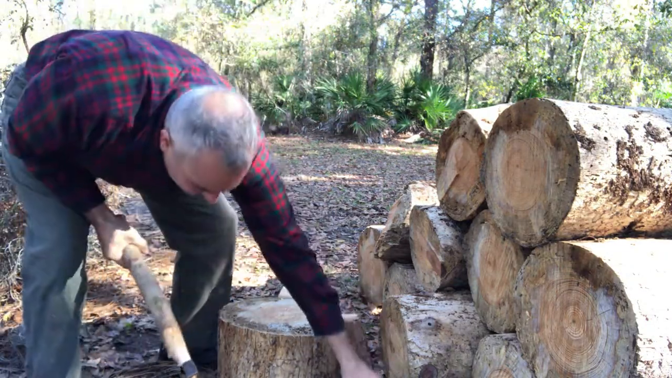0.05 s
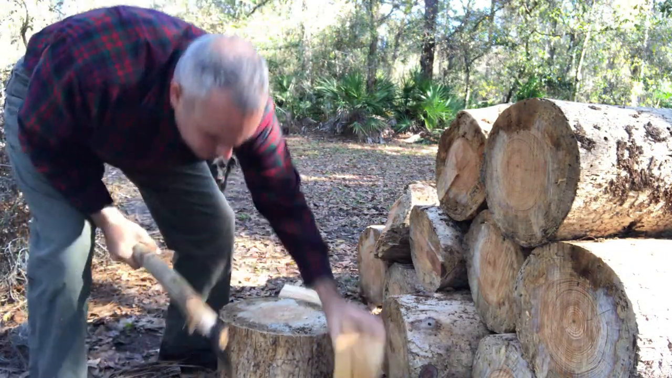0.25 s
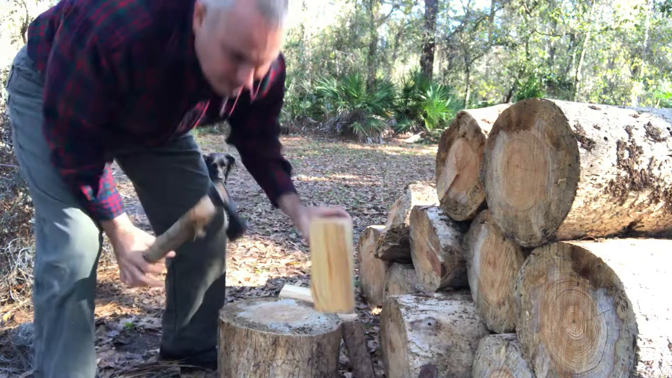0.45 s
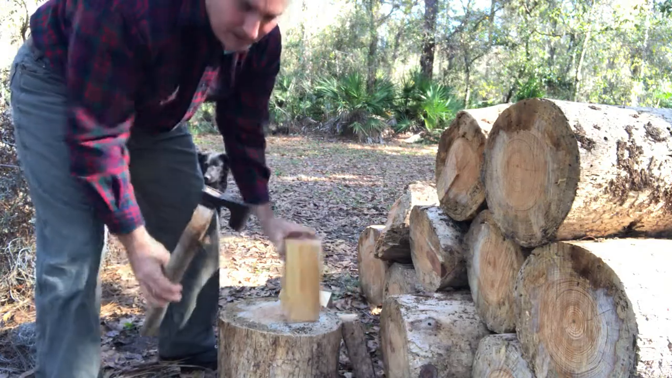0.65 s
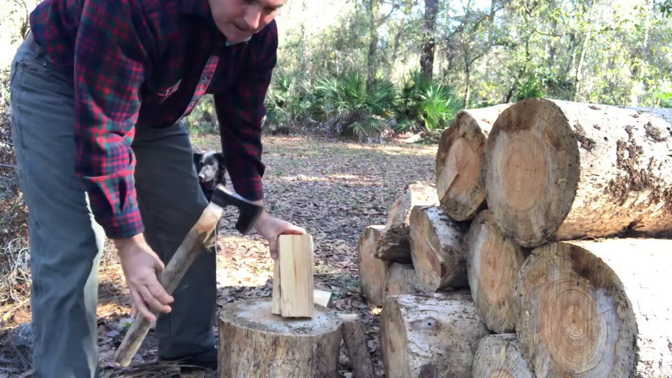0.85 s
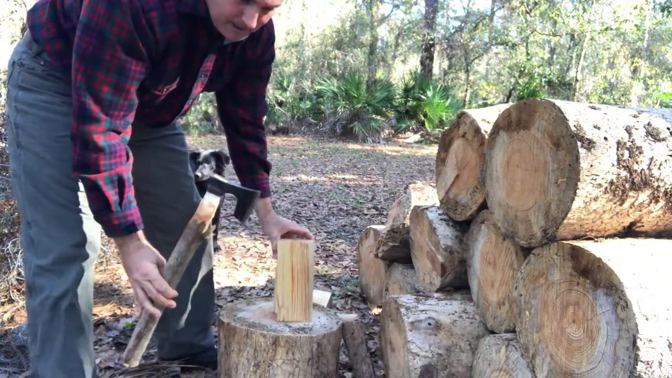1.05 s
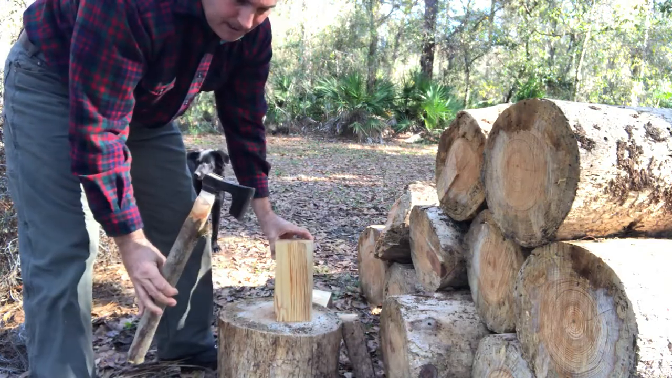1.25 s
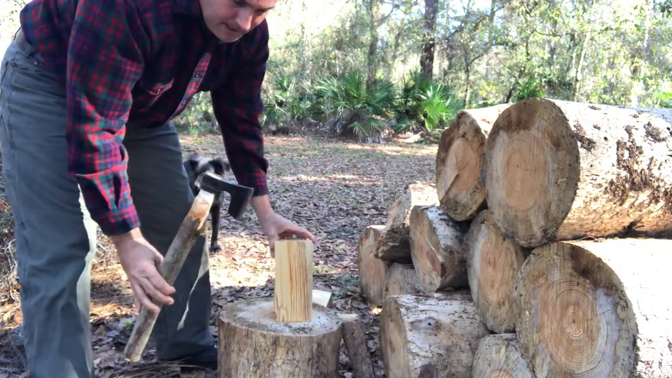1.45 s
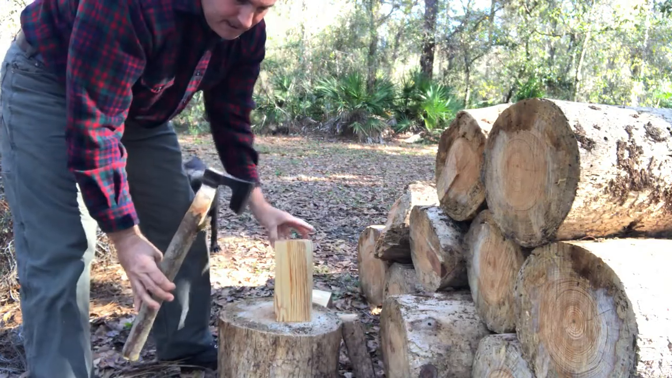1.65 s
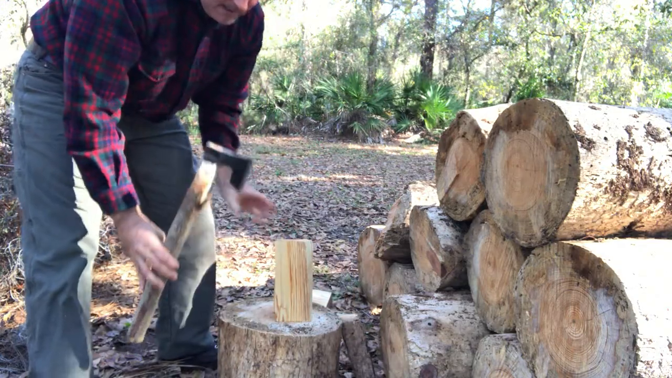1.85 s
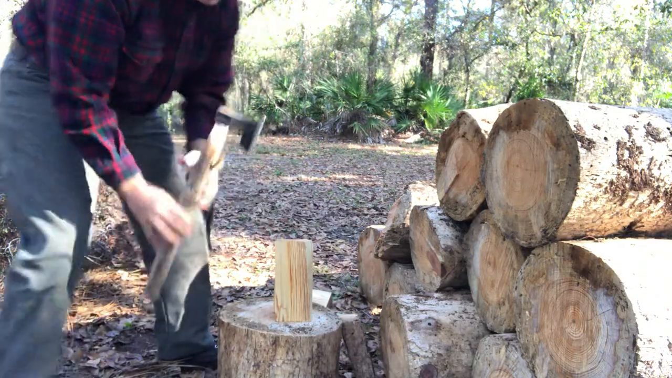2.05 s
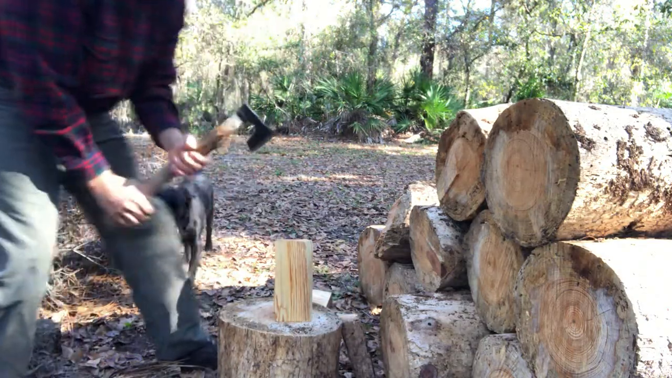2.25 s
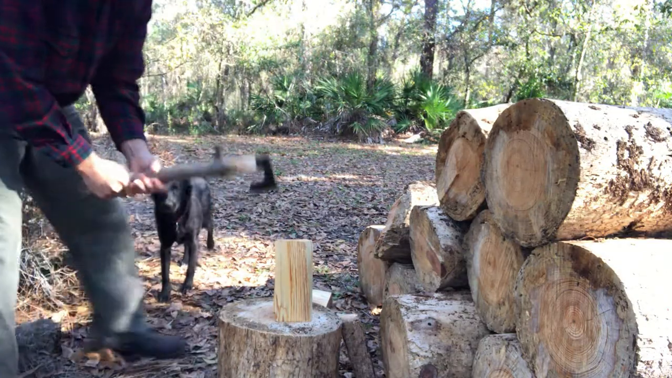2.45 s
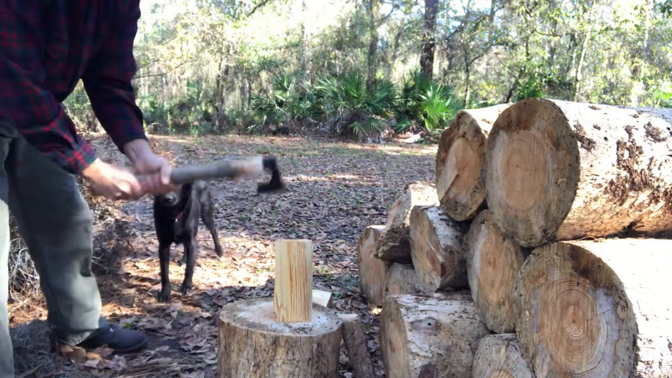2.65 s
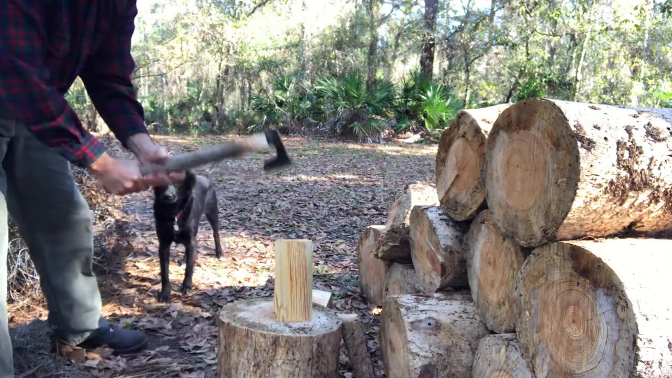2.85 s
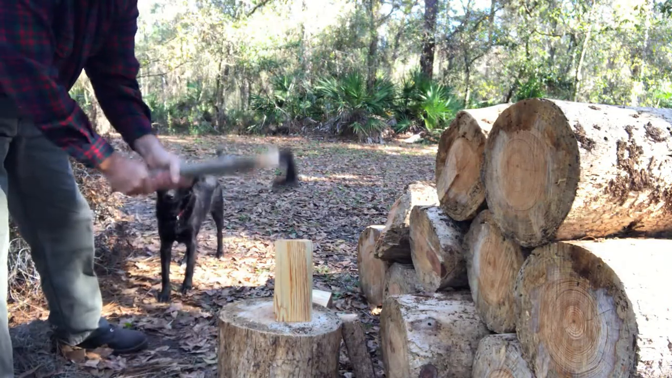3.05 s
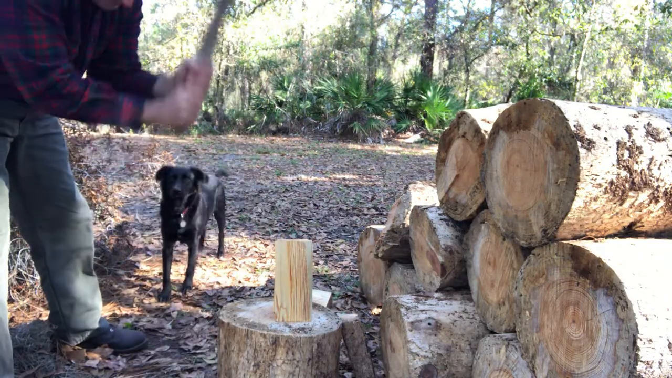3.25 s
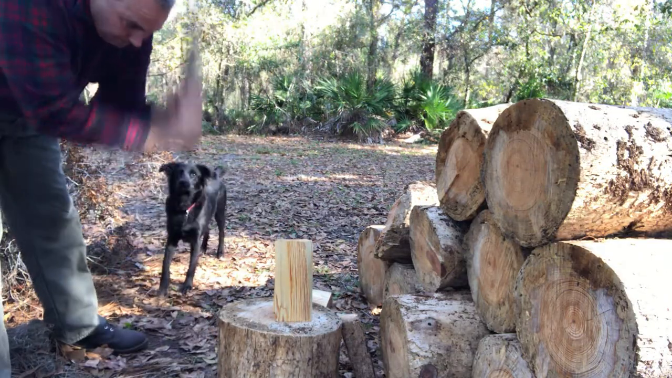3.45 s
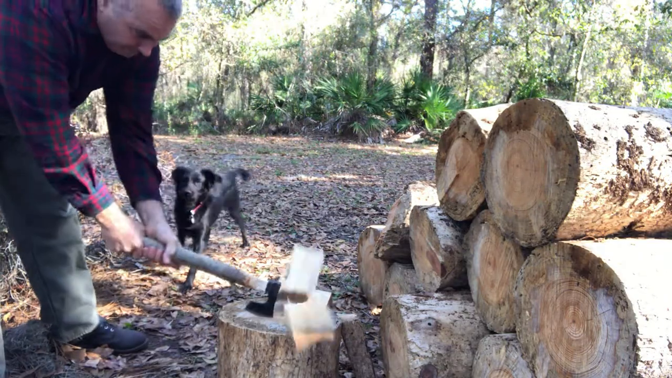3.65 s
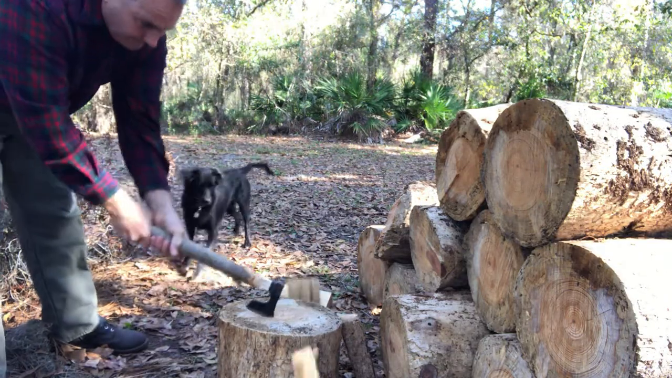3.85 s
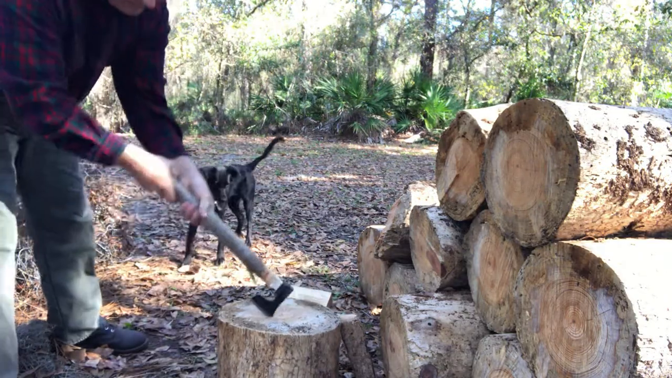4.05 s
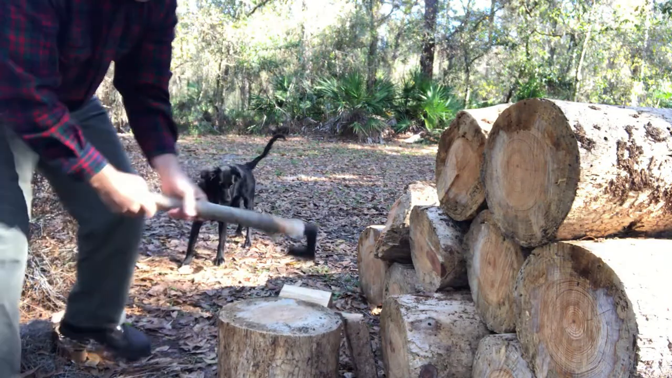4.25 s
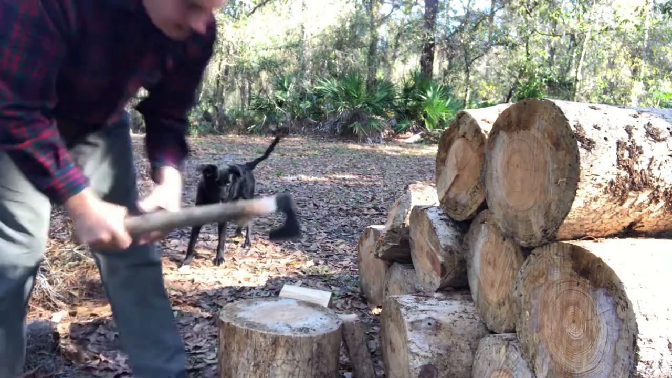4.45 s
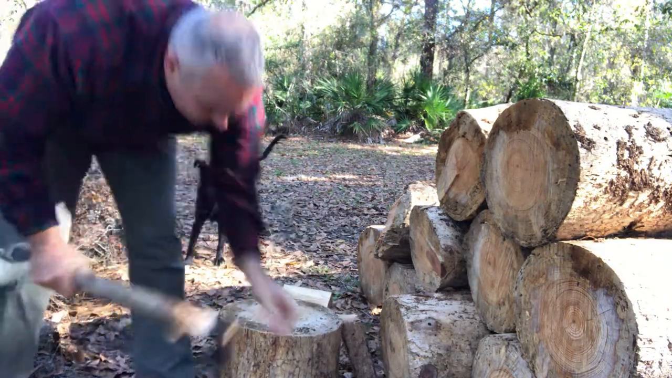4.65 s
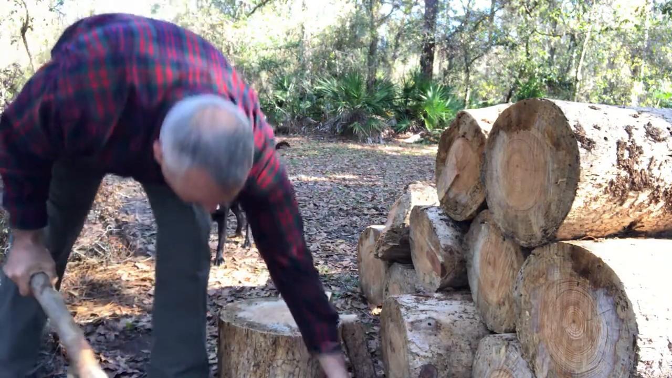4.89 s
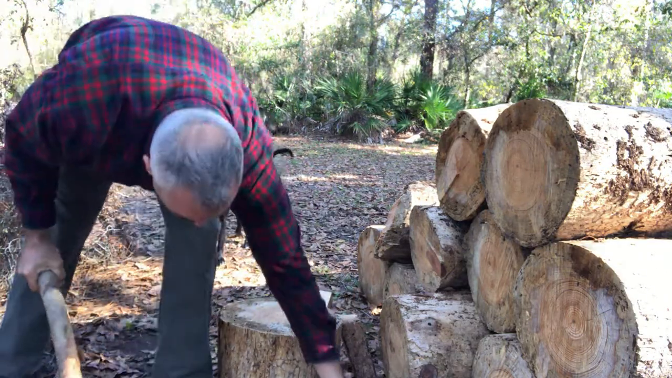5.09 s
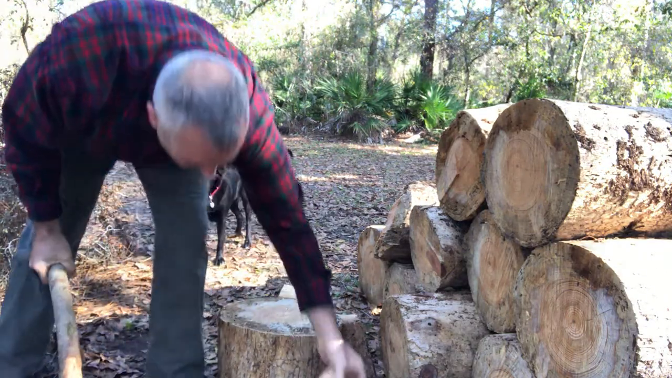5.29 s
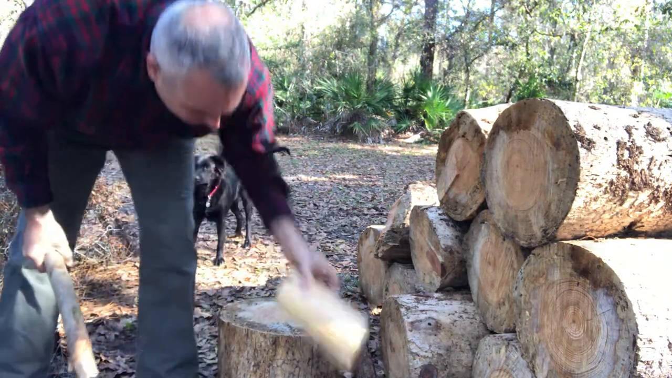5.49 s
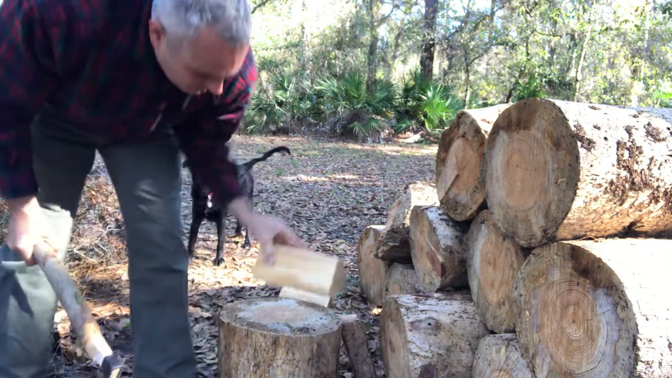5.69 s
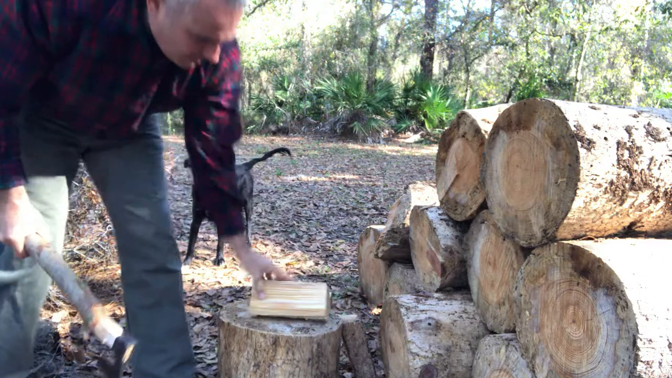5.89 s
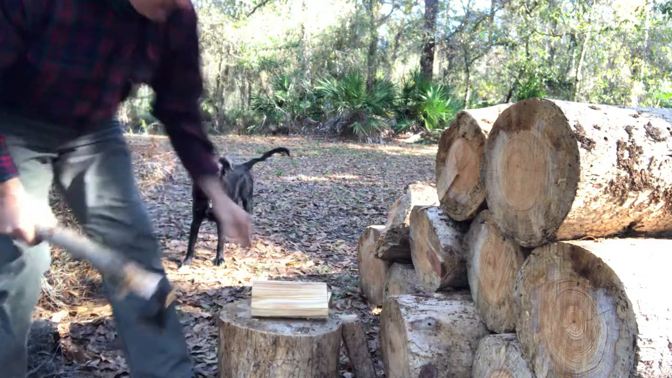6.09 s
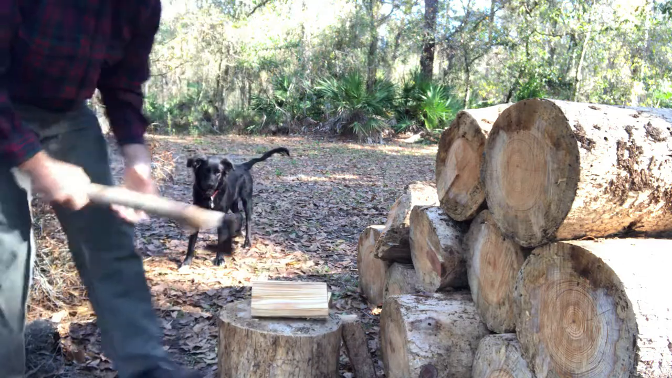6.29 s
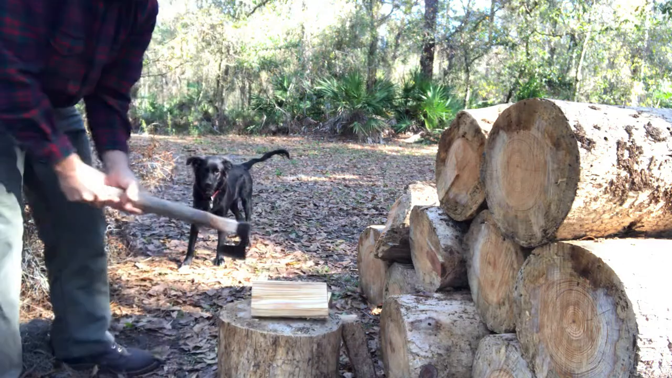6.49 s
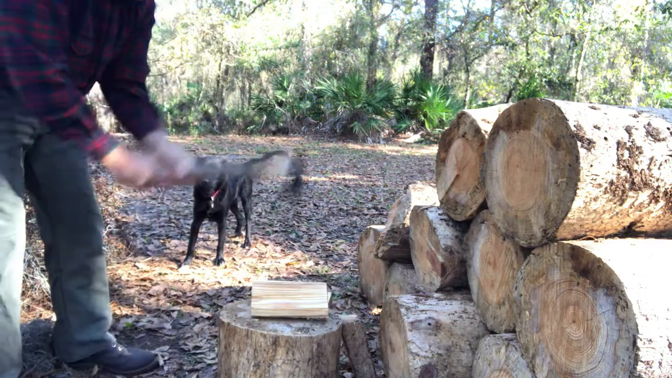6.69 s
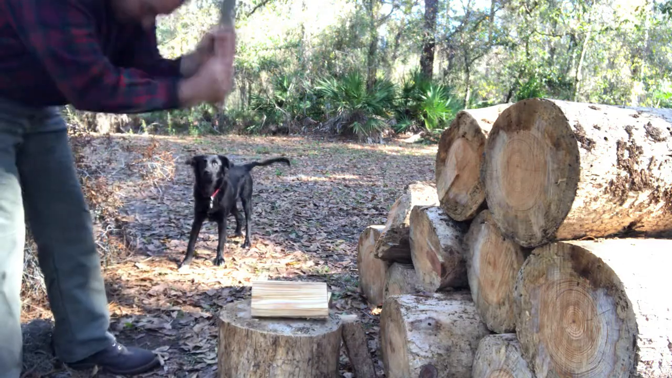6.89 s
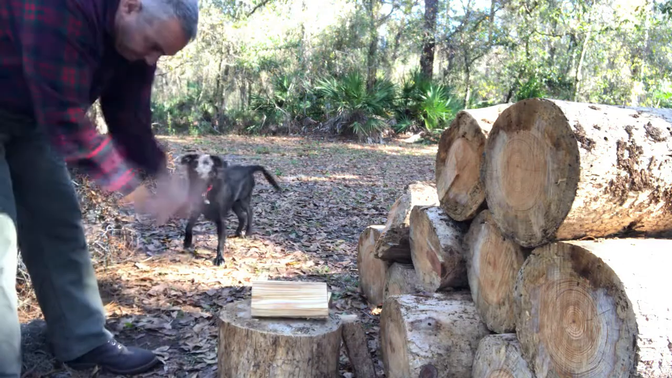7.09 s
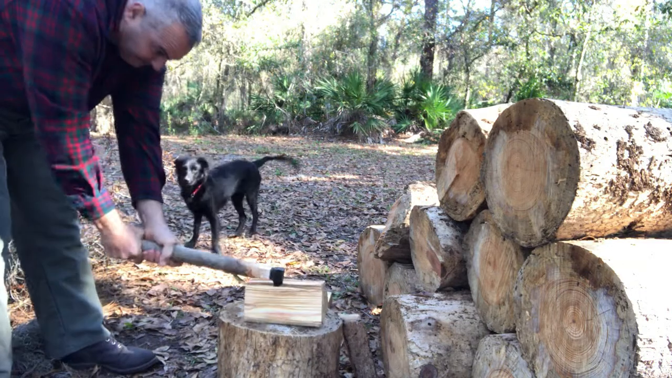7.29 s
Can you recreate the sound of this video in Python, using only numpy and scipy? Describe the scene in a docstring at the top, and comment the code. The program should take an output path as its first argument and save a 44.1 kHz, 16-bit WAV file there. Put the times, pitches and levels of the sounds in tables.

```python
"""Splitting firewood in the woods

A log is set on a stump and a hatchet tears through it: the wood rings, its fibres crack, and the
halves thud into dry leaves. Boots and a dog rustle the leaves, twigs snap and a collar tag tinkles.
Far off, a motor hums over a dull wash of traffic."""
import sys
import numpy as np
from scipy import signal
from scipy.fft import rfft, irfft
from scipy.io import wavfile

SR = 44100
rng = np.random.default_rng(int(sys.argv[2]) if len(sys.argv) > 2 else 0)


def store_wav(level_fs):
    """Save 16-bit WAV to argv[1]."""
    pcm = np.round(np.clip(np.atleast_2d(level_fs), -1, 1) * 32767)
    wavfile.write(sys.argv[1], SR, pcm.T.astype(np.int16))


N = 323253

# The far motor's note: time_s, pitch_hz, level_db
MOTOR_NOTE = [(0.0, 65.3, -48), (0.18, 65.9, -51.5), (0.42, 64.8, -46), (0.9, 64.8, -48.5),
              (1.6, 63, -50.5), (1.72, 63.6, -47), (2.14, 64.7, -48), (2.25, 63.8, -45.5),
              (3.12, 63.9, -50.5), (3.43, 63, -46.5), (3.7, 63.8, -45.5), (4.37, 62.4, -50), (5.3, 62, -48),
              (5.66, 60.2, -46), (5.9, 62.5, -49.5), (6.41, 61.7, -51.5), (6.74, 62.3, -46),
              (6.9, 62.7, -50.5), (7.08, 61.2, -45.5), (7.33, 62.6, -50)]
# The tone of the traffic, from bass to treble: frequency_hz, strength_db
TRAFFIC_TONE = [(20, 3), (40, 6), (75, 0), (100, 5.5), (190, -5.5), (330, -7.5), (500, -2.5), (1030, -3.5),
                (1440, -12.5), (1900, -18), (4000, -24.5), (8000, -32.5), (16000, -42.5)]
# A low drone in the traffic swells and fades: time_s, level_db
TRAFFIC_DRONE = [(0.0, -60.5), (1.4, -67), (3.5, -70.5), (4.1, -60), (4.9, -68.5), (6.2, -66.5),
                 (6.59, -62), (6.82, -71), (7.33, -68)]
# Boots, paws and tumbling wood stir the leaves:
# full_at_s, rise_s, hold_s, fall_s, crackle_db, crunch_above_crackle_db
RUSTLES = [(0.02, 0.062, .12, 0.18, -71.5, 5), (0.216, .05, 0.14, 0.13, -59.5, -5),
           (0.67, .25, 0.15, 0.18, -66, 1), (0.864, 0.033, 0.085, 0.09, -69, 3),
           (1.952, .06, 0.013, 0.088, -65, -8), (2.088, 0.034, .09, 0.082, -56.5, -4.5),
           (2.256, 0.12, 0.025, 0.13, -47, -6.5), (2.419, 0.054, 0.025, 0.14, -62, -3.5),
           (2.524, 0.036, .04, .1, -55.5, -16), (2.62, 0.11, 0.084, 0.068, -48, -7.5),
           (2.864, 0.35, .05, .1, -63.5, -9), (3.438, 0.12, 0.18, 0.24, -70, -3),
           (3.706, .015, .02, .02, -58, 7), (3.774, 0.013, 0.011, 0.16, -53, 5),
           (3.921, 0.0042, 0.013, 0.06, -46.5, -8), (3.992, 0.015, 0.0055, 0.035, -43.5, -1.5),
           (4.024, .1, 0.078, 0.056, -57.5, -5), (4.166, .05, 0.018, 0.065, -50, -1.5),
           (4.207, 0.0054, 0.014, 0.031, -35, -6.5), (4.253, .03, .09, 0.12, -45.5, -3.5),
           (4.449, .15, 0.029, 0.063, -46, -1), (4.471, 0.0097, 0.045, 0.28, -38.5, -5),
           (4.606, 0.078, 0.036, 0.095, -41.5, -6.5), (4.9, 0.12, 0.29, 0.11, -65, 2),
           (5.322, 0.21, 0.065, 0.087, -48.5, -5), (5.518, 0.055, 0.016, .08, -66, -2),
           (5.62, 0.016, .02, 0.079, -65.5, -0.5), (6.018, .05, 0.0062, 0.12, -59, 4),
           (6.277, 0.14, 0.048, 0.18, -56.5, 3), (6.43, .15, 0.053, 0.12, -56.5, -7),
           (6.549, 0.13, 0.058, 0.043, -47, -3), (6.648, .05, 0.06, 0.28, -64, 0),
           (7.2, 0.11, 0.09, .05, -73.5, -16.5)]
# Bright leaf crackle as the microphone colours it, with dips near 5 and 10.5 kHz:
# frequency_hz, strength_db
CRACKLE_AT_MIC = [(710, -35), (1200, -8), (1410, -4), (1950, -6), (2830, -6), (4960, -10.5), (6160, -8),
                  (10500, -14.5), (13500, -15), (16000, -18)]
# The dull tone of the crushed layer below: frequency_hz, strength_db
CRUNCH_TONE = [(200, -26), (400, -11), (700, -7), (1300, -6.5), (2000, -12.5), (3000, -25.5), (5000, -40)]
# The loudest leaves and twigs that break: start_s, peak_db, centre_hz
TWIG_SNAPS = [(0.108, -53, 4000), (0.1583, -40.5, 3980), (0.2068, -33, 3800), (0.9182, -45.5, 3270),
              (1.522, -39.5, 5700), (1.952, -51, 3880), (2.526, -38.5, 7040), (2.6303, -28, 2060),
              (3.8546, -39, 2630), (3.991, -38.5, 4270), (4.078, -39, 3750), (4.0951, -37, 3960),
              (4.2595, -31, 2620), (4.281, -22.5, 2560), (4.473, -29.5, 2500), (4.493, -24, 5000),
              (4.5227, -26, 3000), (4.8114, -41, 9550), (4.8286, -44, 5940), (4.921, -44, 7600),
              (4.9562, -49, 3330), (5.0182, -45, 3940), (5.077, -54, 2630), (5.1319, -39, 2930),
              (5.1645, -38, 6280), (5.2277, -36, 4510), (5.336, -31.5, 2890), (5.391, -30, 1990),
              (5.4335, -36, 4420), (5.6119, -41, 9240), (5.826, -50, 3666), (6.2707, -43, 2590),
              (6.686, -45, 3880), (6.987, -48.5, 2850), (7.1898, -44, 2650)]
# Knocks and cracks that ring the wood: start_s, peak_db, pitch_hz, spread_octaves, splinter_db
WOOD_HITS = [(0.8321, -20, 1710, 0.27, -32.5), (0.8336, -6, 920, 0.23, -25),
             (0.8363, -25.5, 340, 0.17, -62), (0.838, -23, 795, .42, -62), (0.860, -38, 800, .5, -55),
             (2.404, -36.5, 1550, 0.18, -51), (3.716, -29, 900, .6, -55), (3.726, -3, 1550, 0.098, -9.5),
             (3.7275, -4.5, 640, 0.13, -28), (3.730, -4.5, 1150, 0.1, -14.5),
             (3.733, -0.5, 1806, 0.31, -11.5), (3.7357, -3, 2040, 0.16, -10.5),
             (3.745, -22, 1160, 0.88, -27), (3.756, -10, 1740, 0.21, -26), (3.759, -9.5, 1120, 0.48, -41),
             (3.920, -30, 394, 0.69, -23.5), (3.923, -31, 1915, 0.017, -35), (3.938, -30, 504, 0.19, -52),
             (3.998, -30, 1646, 0.55, -50), (4.142, -28.5, 1150, 0.28, -30), (4.173, -22.5, 531, 0.15, -42),
             (4.183, -31, 960, .1, -46), (4.206, -43, 1660, .5, -39), (4.217, -23, 1190, 0.44, -36.5),
             (4.300, -30, 1236, 0.1, -39), (4.333, -26, 1900, .5, -41), (4.992, -36.5, 2900, .17, -53),
             (5.097, -36.5, 1480, 0.34, -45.5), (5.963, -3, 720, 0.52, -23), (5.966, -18, 809, 0.35, -40),
             (5.972, -11, 863, 0.4, -32.5), (5.9731, -3, 1150, 0.65, -29),
             (5.982, -12.5, 2400, 0.38, -35.5), (5.9832, -11.5, 944, 0.13, -21),
             (5.984, -4, 1030, 0.39, -32), (5.988, -21, 940, 0.059, -43), (6.007, -12, 660, .5, -38),
             (6.009, -18, 1187, 0.24, -38.5), (6.015, -27.5, 980, 0.78, -40),
             (6.189, -40, 831, 0.46, -67.5), (7.275, -35, 1210, 0.23, -43.5),
             (7.287, -23.5, 700, 0.49, -38.5), (7.2979, 0.5, 3400, .3, -14),
             (7.2989, -2.5, 746, .15, -12.5), (7.3013, 2.5, 1330, 0.043, -13.5),
             (7.3021, -10, 1214, 0.062, -19), (7.307, -23, 1300, .5, -26), (7.3172, -29, 2070, 0.081, -24),
             (7.326, -31, 1150, .3, -30)]
# The notes of log and stump when free to ring: pitch_hz, strength_db, free_ring_s
WOOD_NOTES = [(261, -20, 0.033), (360, 1, 0.056), (483, -8, 0.013), (659, -1, 0.032), (720, -4.5, 0.0076),
              (818, -6, 0.046), (970, 3.5, 0.031), (1150, 5, 0.031), (1310, 4.5, 0.019), (1460, 3.5, 0.042),
              (1719, 8.5, 0.034), (1932, 4, 0.044), (2070, -9, 0.011), (2400, 0.5, 0.0052),
              (2900, -3.5, 0.018), (3570, 0, 0.027), (4200, -20, 0.014)]
# Bright splintering noise as the microphone colours it: frequency_hz, strength_db
SPLINTER_AT_MIC = [(500, -39), (1200, -9), (2000, 1), (3300, -2), (5000, -8), (6600, -5), (10300, -16),
                   (13000, -13.5), (16000, -19), (17000, -55)]
# Heavy ends land on soil and the stump rocks: start_s, peak_db, pitch_hz, ring_s
SOIL_THUDS = [(0.855, -30.5, 84, 0.038), (3.773, -30, 92, 0.11), (3.926, -33, 72.7, 0.054),
              (4.01, -24, 108, 0.075), (4.223, -29, 98, 0.11), (4.474, -36.5, 149.3, 0.029),
              (5.986, -31, 99, 0.09), (6.373, -41.5, 148, 0.047), (7.31, -25, 80, 0.12)]
# Each tinkle of the collar tag: start_s, gain_db
TAG_HITS = [(1.1074, -54.5), (1.1932, -69.5), (1.257, -62), (1.3643, -78)]
# The notes of the metal tag: pitch_hz, strength_db, ring_s
TAG_NOTES = [(9270, -6, 0.35), (13700, -19, .18)]

SNAP_FADE_S = 0.015   # how fast a breaking leaf or twig dies away


def from_db(db):
    """Turn decibels into a number to multiply by."""
    return 10 ** (np.asarray(db) / 20)


def unit_level(x):
    """Scale a sound so its average power is 1."""
    return x / np.sqrt(np.mean(x ** 2) + 1e-20)


def in_time(rows):
    """Join timed rows with straight lines, one curve for each column."""
    times, *columns = np.transpose(rows)
    return [np.interp(np.arange(N) / SR, times, column) for column in columns]


def with_tone(x, tone):
    """Filter a sound to follow a tone table, with no ringing ahead of a click (minimum phase)."""
    hz, db = np.transpose(tone)
    grid_hz = np.maximum(np.arange(2049) * SR / 4096, 1)
    gains = from_db(np.interp(np.log(grid_hz), np.log(hz), db))
    cepstrum = irfft(np.log(gains))
    cepstrum[1:2048] *= 2
    cepstrum[2049:] = 0
    return signal.fftconvolve(x, irfft(np.exp(rfft(cepstrum))))[:len(x)]


def drift(rate_hz):
    """A smooth random wobble with a typical size of 1."""
    r = np.exp(-80 * np.pi * rate_hz / SR)
    slow = signal.lfilter([1], [1, -2 * r, r * r], rng.standard_normal(N // 40 + 2002))[2000:]
    return np.interp(np.arange(N) / 40, np.arange(len(slow)), unit_level(slow))


def dying(t, fade_s):
    """A fade that drops 60 dB in fade_s seconds."""
    return from_db(-60 * t / fade_s)


def add(out, start_s, sound):
    """Mix a sound in at its start time."""
    at = round(start_s * SR)
    out[at:at + len(sound)] += sound[:N - at]


def far_motor():
    """A motor's low note wavers on its way through the air."""
    pitch_hz, level_db = in_time(MOTOR_NOTE)
    phase = 2 * np.pi * np.cumsum(pitch_hz) / SR + 0.22 * drift(3.1)
    return np.sqrt(2) * from_db(level_db + 1.2 * drift(3.8)) * np.sin(phase)


def far_traffic(wash_db=-57, drone_hz=(196, 371)):
    """Distant traffic blurs into smooth, dull noise with a low drone that comes and goes."""
    wash = unit_level(with_tone(rng.standard_normal(N), TRAFFIC_TONE))
    wash *= from_db(wash_db + 0.61 * drift(0.4))
    drone_band = signal.butter(2, drone_hz, "band", fs=SR, output="sos")
    drone = unit_level(signal.sosfilt(drone_band, rng.standard_normal(N)))
    return wash + from_db(in_time(TRAFFIC_DRONE)[0]) * drone


def tiny_breaks(per_s, uneven_db, clump_db, clump_hz, low_hz, high_hz, bands=7):
    """Leaves break in clumps of uneven clicks, each click in one band of pitch."""
    sizes = from_db(uneven_db * np.minimum(rng.exponential(1, N), 5)) * rng.choice([-1, 1], N)
    happens = rng.random(N) < per_s / SR
    clicks = sizes * happens * from_db(clump_db * drift(clump_hz)) + 1e-18
    edges_hz = np.linspace(low_hz ** .5, high_hz ** .5, bands + 1) ** 2
    band_of_click = rng.integers(0, bands, N)
    out = np.zeros(N)
    for k in range(bands):
        band = signal.butter(2, edges_hz[k:k + 2], "band", fs=SR, output="sos")
        out += signal.sosfilt(band, clicks * (band_of_click == k))
    return out


def rustling_leaves(strays_per_s=35):
    """Dry leaves crackle brightly; the weight of a step crushes the layer below with a duller crunch."""
    t = np.arange(N) / SR
    stir_db = 1.5 * drift(7.4)   # faint, restless stirring between steps
    crackle_level, crunch_level = from_db(stir_db - 76), from_db(stir_db - 68.5)
    for full_at_s, rise_s, hold_s, fall_s, crackle_db, crunch_above_db in RUSTLES:
        before = np.maximum(full_at_s - t, 0) / rise_s
        after = np.maximum(t - full_at_s - hold_s, 0) / fall_s
        rustle = from_db(crackle_db - 20 * (before + after))   # 20 dB for each rise or fall time
        crackle_level = np.hypot(crackle_level, rustle)
        crunch_level = np.hypot(crunch_level, rustle * from_db(crunch_above_db))
    # Stray small leaves give way at random, each briefly lifting the crackle.
    strays = from_db(5) * rng.random(N) * (rng.random(N) < strays_per_s / SR)
    crackle_level *= 1 + signal.lfilter([1], [1, -dying(1 / SR, SNAP_FADE_S)], strays + 1e-18)
    bright = tiny_breaks(20000, uneven_db=1.5, clump_db=1.0, clump_hz=53, low_hz=700, high_hz=17680)
    dull = tiny_breaks(14000, uneven_db=3.0, clump_db=3.5, clump_hz=30, low_hz=152.2, high_hz=5980)
    crackle = crackle_level * unit_level(with_tone(bright, CRACKLE_AT_MIC))
    crunch = crunch_level * unit_level(with_tone(dull, CRUNCH_TONE))
    return crackle + crunch


def snapping_twigs(half_width_octaves=0.68):
    """A twig or leaf breaks with one short puff of noise."""
    out, t = np.zeros(N), np.arange(SR // 12) / SR
    for start_s, peak_db, centre_hz in TWIG_SNAPS:
        puff = rng.standard_normal(len(t)) * dying(t, SNAP_FADE_S)
        edges_hz = centre_hz * 2 ** (half_width_octaves * np.array([-1, 1]))
        snap = signal.lfilter(*signal.butter(1, edges_hz, "band", fs=SR), puff)
        add(out, start_s, from_db(peak_db) * snap / np.abs(snap).max())
    return out


def struck_wood(luck_db=1.5):
    """Each hit rings the wood's notes nearest its own pitch; tearing fibres add bright noise."""
    out, t = np.zeros(N), np.arange(SR // 5) / SR
    note_hz, note_db, free_ring_s = np.transpose(WOOD_NOTES)[:, :, None]
    splinters = unit_level(with_tone(rng.standard_normal(N), SPLINTER_AT_MIC))
    bass_cut = signal.butter(2, 220, "high", fs=SR)   # a log is too small to give off bass
    for start_s, peak_db, pitch_hz, spread_octaves, splinter_db in WOOD_HITS:
        spread_octaves = max(spread_octaves, .03)
        nearness = np.exp(-.5 * (np.log2(note_hz / pitch_hz) / spread_octaves) ** 2) + 0.009
        strengths = nearness * from_db(note_db + luck_db * rng.standard_normal(note_db.shape))
        # A hand or the stump damps the wood; hits with a narrow spread ring longer.
        ring_s = free_ring_s * 0.42 * spread_octaves ** -.3
        ring = np.sum(strengths * np.sin(2 * np.pi * note_hz * t) * dying(t, ring_s), axis=0)
        contact = np.hanning(3 + round(.6 * SR / pitch_hz))   # low hits are soft, slow pushes
        knock = signal.lfilter(*bass_cut, np.convolve(ring, contact)[:len(t)])
        add(out, start_s, from_db(peak_db) * knock / np.abs(knock).max())
        tear = splinters[round(start_s * SR):][:len(t)]
        add(out, start_s, from_db(splinter_db) * tear * dying(t, fade_s=0.02)[:len(tear)])
    return out


def tree_echo(sound, dull_above_hz=3000):
    """The log pile and the trunks scatter back a faint, dull echo."""
    t = np.arange(SR // 2) / SR
    build_up = 1 - np.exp(-t / 0.0062)
    scatter = from_db(-50) * rng.standard_normal(len(t)) * dying(t, fade_s=0.18) * build_up
    echo = signal.fftconvolve(sound, scatter)[:N]
    return signal.lfilter(*signal.butter(1, dull_above_hz, fs=SR), echo)


def soil_thuds():
    """Soil answers a heavy landing with a low note that quickly dies."""
    out, t = np.zeros(N), np.arange(SR // 3) / SR
    build_up = 1 - np.exp(-t / 0.0011)
    for start_s, peak_db, pitch_hz, ring_s in SOIL_THUDS:
        thud = np.sin(2 * np.pi * pitch_hz * t) * dying(t, ring_s) * build_up
        add(out, start_s, from_db(peak_db) * thud / np.abs(thud).max())
    return out


def collar_tag():
    """The dog's thin metal tag rings with two very high notes."""
    out, t = np.zeros(N), np.arange(SR // 2) / SR
    ring = sum(from_db(db) * np.sin(2 * np.pi * hz * t) * dying(t, ring_s)
               for hz, db, ring_s in TAG_NOTES)
    for start_s, gain_db in TAG_HITS:
        add(out, start_s, from_db(gain_db) * ring)
    return out


def scene():
    """Mix everything into one channel; only the hits and thuds get an echo."""
    chopping = struck_wood() + soil_thuds()
    nearby = chopping + tree_echo(chopping) + snapping_twigs() + rustling_leaves() + collar_tag()
    return (nearby + far_motor() + far_traffic())[None]


def record(dry, lowest_hz=36, highest_hz=15800):
    """The microphone loses the deepest bass, rounds off loud peaks and cuts the highest treble."""
    heard = signal.sosfilt(signal.butter(4, lowest_hz, "high", fs=SR, output="sos"), dry)
    rounded = 1.1 * np.tanh(heard / 1.1)
    return signal.sosfilt(signal.ellip(12, .5, 100, highest_hz, fs=SR, output="sos"), rounded)


dry = scene()
out = record(dry)
store_wav(out)
```